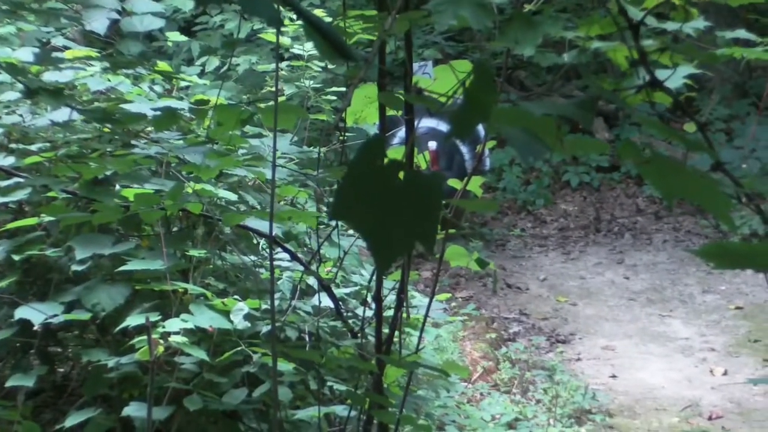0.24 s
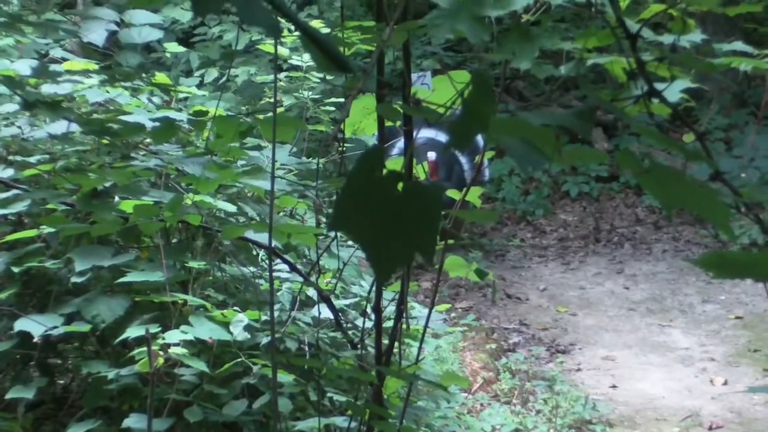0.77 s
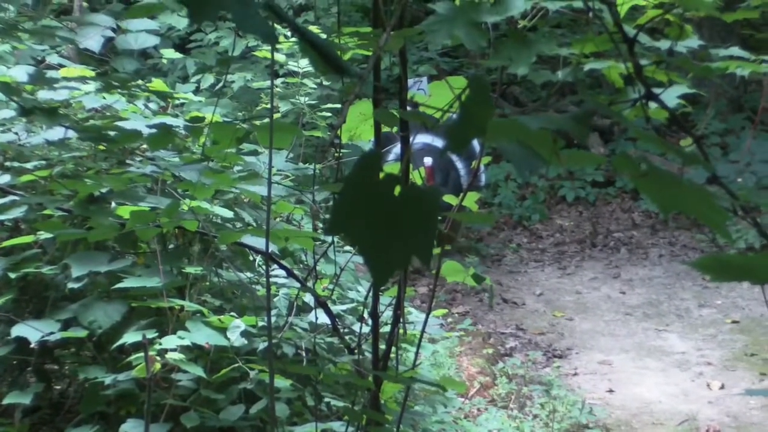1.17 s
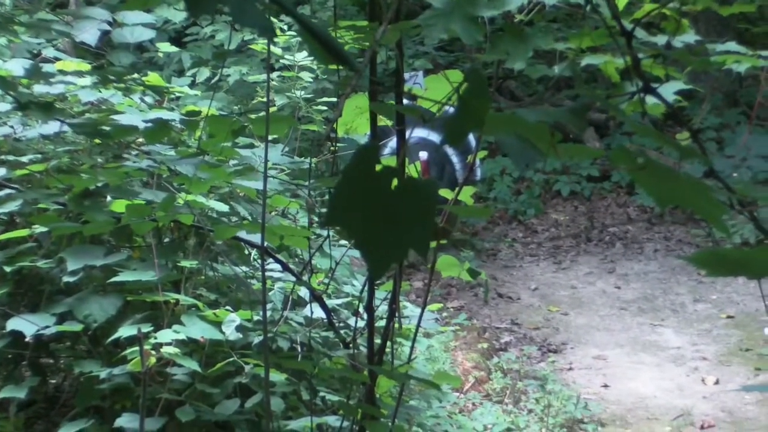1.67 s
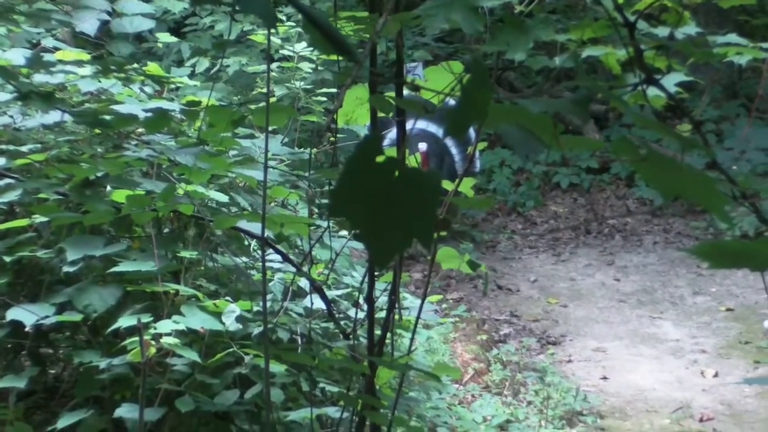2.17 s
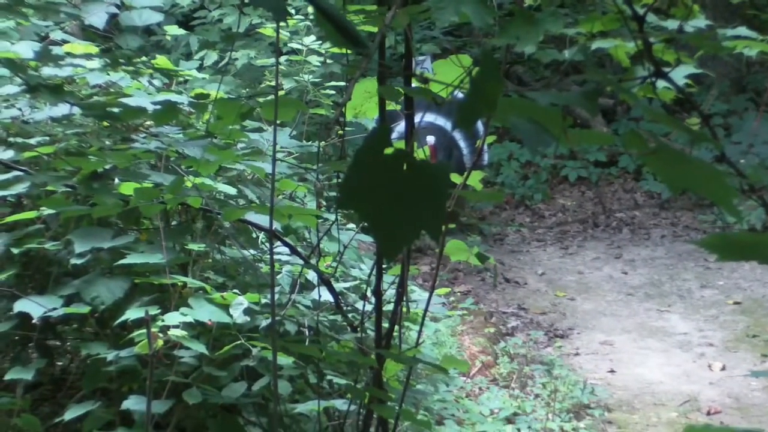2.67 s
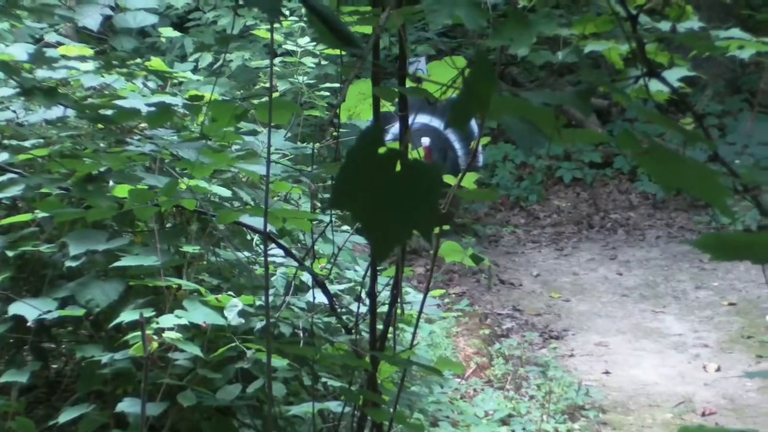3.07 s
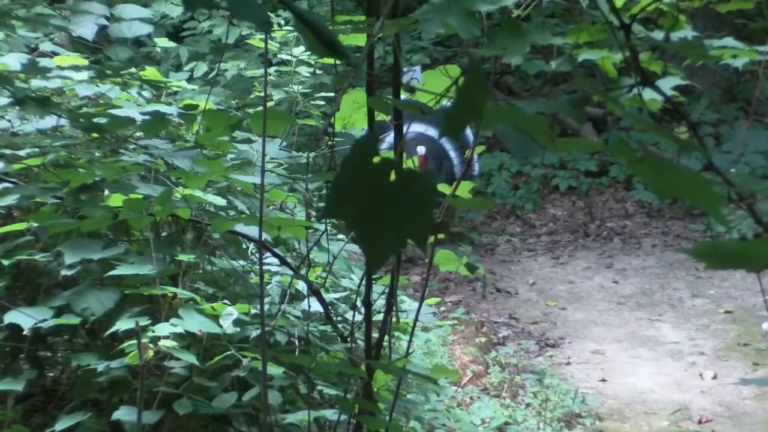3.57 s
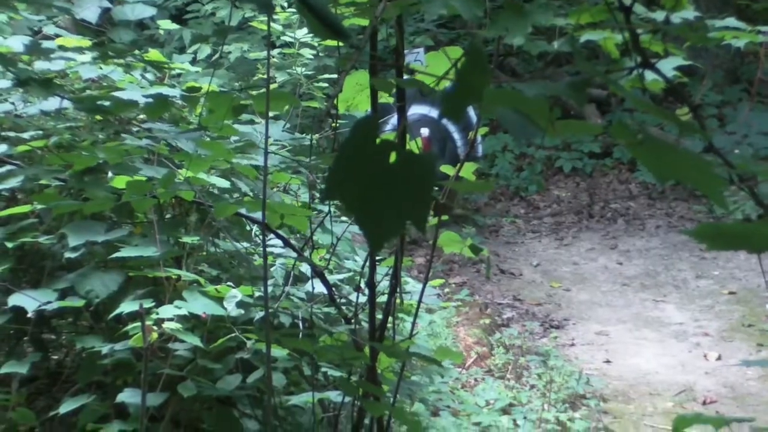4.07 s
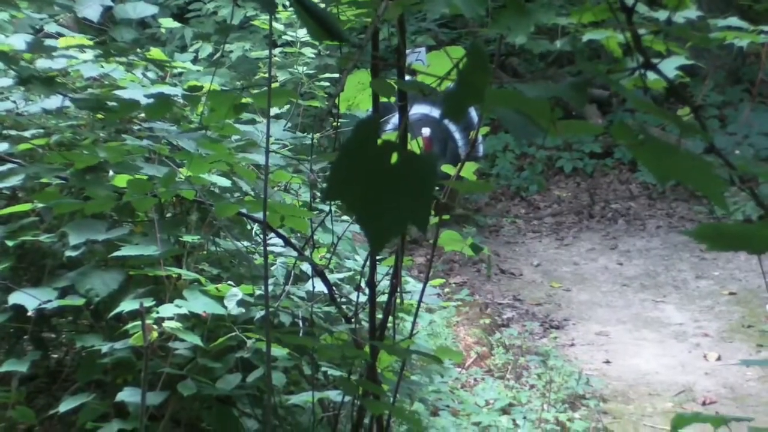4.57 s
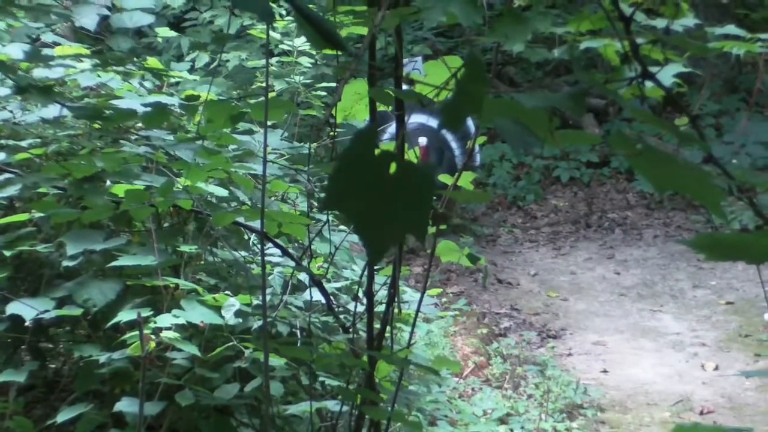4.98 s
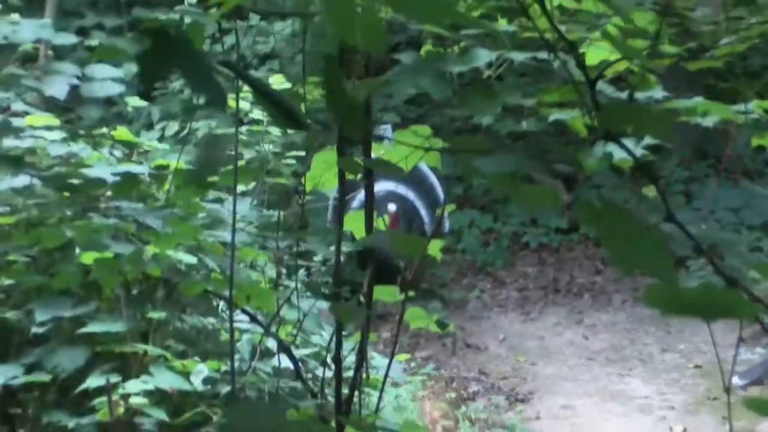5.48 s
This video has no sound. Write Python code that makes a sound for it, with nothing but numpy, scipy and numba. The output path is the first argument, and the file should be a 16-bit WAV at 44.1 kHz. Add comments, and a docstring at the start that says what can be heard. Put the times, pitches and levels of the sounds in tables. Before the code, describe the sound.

A low, quiet rumble of far traffic runs throughout, in a wood. At about 0.3 seconds a crossbow's steel safety catch ticks lightly, with a clearer click at 0.5 seconds. A distant engine drones and fades away from about 1.5 seconds. An insect gives very faint, thin buzzes near 1.6, 3.1 and 4.8 seconds. Two far cars pass softly at around 4 and 4.9 seconds. At 5.2 seconds the trigger ticks and the crossbow fires at once with a very loud, sharp crack, a quick rattle of loose parts and a short low hum from its arms and string. The crack overloads the microphone, so the level dips briefly before the echo from the trees swells back. At 5.5 seconds the bolt hits the target with a quieter snap and dull thud.

```python
"""A crossbow shot in the woods. Far traffic rumbles all along, and first the steel safety catch clicks.
An engine draws away, an insect buzzes faintly and two far cars pass. At 5.2 s the trigger ticks, the
string slams into its stops, loose parts rattle and the bow's arms hum. The crack overloads the microphone,
so gain control turns the sound down, then lets the echo of the trees swell back.
A quarter of a second after the crack, the bolt thuds into the target."""
import sys
import numpy as np
from scipy import signal
from scipy.fft import rfft, irfft, next_fast_len
from scipy.io import wavfile
from scipy.ndimage import map_coordinates
from numba import njit

SR = 44100
rng = np.random.default_rng(int(sys.argv[2]) if len(sys.argv) > 2 else 0)


def unload_audio(sound):
    """Save the sound as a 16-bit wav file, at the path given as the first command line argument."""
    columns = np.transpose(np.atleast_2d(sound))
    # keep every value between -1 and 1, then stretch to whole-number steps
    steps = np.round(np.clip(columns, -1, 1) * 32767)
    wavfile.write(sys.argv[1], SR, steps.astype(np.int16))


N = 253134
T = np.arange(N) / SR
STOP_S = 5.2378  # the string reaches its stops
LEFT_RIGHT = np.array([[1], [-1]])  # adds on the left, subtracts on the right


def undb(db):
    """Turn decibels into a gain."""
    return 10 ** (np.asarray(db) / 20)


def unit(x):
    """Scale to an average (rms) level of 1."""
    return x / np.sqrt(np.mean(x ** 2))


def noise(colour, size=N):
    """Noise of rms 1; the colour's rows (f/Hz, level/dB) say which pitches are stronger."""
    hz, db = np.transpose(colour)
    n = next_fast_len(size)
    f = np.maximum(np.fft.rfftfreq(n, 1 / SR), 1)
    gain = undb(np.interp(np.log(f), np.log(hz), db))
    return unit(irfft(rfft(rng.standard_normal(n)) * gain, n)[:size])


def walk(rate):
    """A smooth random wobble of rms 1 that changes rate times a second."""
    points = rng.standard_normal(N)[:int(T[-1] * rate) + 4]
    return unit(map_coordinates(points, [T * rate], order=2, mode="nearest"))


def fade(t, t60):
    """Die away by 60 dB in t60 seconds, the ring time."""
    return np.exp(-np.log(1000) * t / t60)


def ring(modes, size):
    """The fading tones of a struck object, from rows of f/Hz, level/dB, ring time/s."""
    t = T[:size]
    return sum(undb(db) * np.sin(2 * np.pi * hz * t) * fade(t, t60) for hz, db, t60 in modes)


def add(out, s, x):
    """Mix x into out, starting at s seconds."""
    i = int(s * SR)
    out[i:i + len(x)] += x[:N - i]


# colour of far traffic and leaves: f/Hz, level/dB
RUMBLE_COLOUR = [(12, -30.5), (20, -5), (60, 2.5), (93, -8.5), (120, -8), (158, -10), (198, -8),
                 (228, -10.5), (262, -10.5), (410, -18.5), (738, -16), (1710, -24), (2200, -33.5),
                 (6720, -47), (16000, -57.5)]
# colour of tyres on the road: f/Hz, level/dB
TYRE_COLOUR = [(200, -33.5), (450, -1), (800, 8), (1050, -0.5), (1400, -2.5), (2200, -53.5), (4000, -46)]
# each car at its nearest: t/s, level/dB
CARS = [(4.049, -42.5), (4.85, -43.5)]
def traffic(rumble_db=-39, pass_s=.26, drone_hz=127, drone_db=-45.5, leaves_s=1.45, fall_db_per_s=11):
    """A far road rumbles, tyres swell as each car nears, and a wavering engine draws away."""
    rumble = noise(RUMBLE_COLOUR) * undb(rumble_db + .5 * walk(5.82))
    swells = [undb(db) / np.hypot(1, (T - s) / pass_s) for s, db in CARS]  # 3 dB down after pass_s
    tyres = noise(TYRE_COLOUR) * np.linalg.norm(swells, axis=0) * undb(walk(9))
    phase = 2 * np.pi * np.cumsum(drone_hz + 2.5 * walk(11)) / SR
    low_tone = np.sin(phase) * undb(2 * walk(6.2))
    octave = np.sin(2 * phase) * undb(-4 + 2 * walk(23))
    engine = (low_tone + octave) * undb(drone_db - fall_db_per_s * np.maximum(T - leaves_s, 0))
    return rumble + tyres + engine


# an insect's thin buzzes: t/s, length/s, level/dB
BUZZES = [(1.58, .18, -73), (3.06, 0.21, -71), (4.75, 0.21, -72)]
def insect(pitch_hz=7300, width_hz=1100):
    """Short high buzzes, blurred by the leaves."""
    out = np.zeros(N)
    lowpass = signal.butter(2, width_hz / 2, fs=SR, output="sos")
    for s, length, db in BUZZES:
        n = int(length * SR)
        blur = signal.sosfilt(lowpass, rng.standard_normal(SR))[:n]
        buzz = unit(blur * np.sin(2 * np.pi * pitch_hz * T[:n]))
        add(out, s, undb(db) * buzz * signal.windows.tukey(n, .5))
    return out


# colour of the trees' echo: f/Hz, level/dB
ECHO_COLOUR = [(80, -10), (250, 7.5), (600, 7), (1500, 1.5), (2600, -1.5), (3800, -5), (5200, -4.5),
               (6400, -1.5), (7600, -13.5), (9500, -24), (15000, -26.5)]
def tree_echo(echo_db=-23, t60=1.0, build_s=.03):
    """Trunks and leaves scatter the crack into a long, fading wash of noise."""
    age = np.maximum(T - STOP_S, 0)
    build_up = 1 - np.exp(-age / build_s)
    return noise(ECHO_COLOUR) * undb(echo_db) * build_up * fade(age, t60)


# clicks of the safety catch and trigger: t/s, level/dB, ring time/s
CLICKS = [(0.2834, -42.5, .016), (.3075, -46, .016), (.4917, -47, .012), (0.5078, -31, 0.011),
          (.5110, -30.5, .013), (.5426, -48, .01), (5.2033, -25.5, 0.041)]
# tones of the steel latch: f/Hz, level/dB, ring time as a multiple of the click's
LATCH_TONES = [(3270, -10, 1), (3440, 2.5, 1.7), (3590, -6, 1), (3940, 0.5, .8), (4230, -2, .8),
               (4630, 0, .8), (5530, -5, .6)]
def latch(snap_db=-8, snap_t60=.008, band_hz=(2800, 5100), size=4000):
    """Small steel parts meet with a dry snap and ring briefly."""
    out = np.zeros(N)
    bandpass = signal.butter(3, band_hz, "bandpass", fs=SR, output="sos")  # too small to give off lows
    for s, db, t60 in CLICKS:
        tones = ring([(hz, tone_db, t60 * share) for hz, tone_db, share in LATCH_TONES], size)
        snap = undb(snap_db) * np.abs(tones).max() * rng.standard_normal(size) * fade(T[:size], snap_t60)
        tick = signal.sosfilt(bandpass, tones + snap)
        add(out, s, undb(db) * tick / np.abs(tick).max())
    return out


# the bolt pierces the target's face: t/s, level/dB
SNAPS = [(5.4931, -9.5), (5.4946, -12.5)]
# colour of those snaps: f/Hz, level/dB
SNAP_COLOUR = [(300, 1), (900, -8), (1400, 13), (2300, 5), (4000, -8.5), (7000, -17), (15000, -30)]
# tones of the block behind the face: f/Hz, level/dB, ring time/s
BLOCK_TONES = [(96, -31, 0.11), (212, -9, 0.038), (302, -20, 0.038), (466, -15.5, 0.033), (795, -15, 0.018)]
def target(snap_t60=.0058, thud_s=5.4973, size=2000):
    """The bolt snaps through the face, then the block stops it with a dull thud."""
    out = np.zeros(N)
    for s, db in SNAPS:
        snap = noise(SNAP_COLOUR, size) * fade(T[:size], snap_t60)
        add(out, s, undb(db) * snap / np.abs(snap).max())
    add(out, thud_s, ring(BLOCK_TONES, size=SR))
    return out


# tones of the bow's arms and string: f/Hz, level/dB, ring time/s
ARM_TONES = [(60, -4.5, 0.045), (91, -5.5, .52), (122, 13, 0.082), (152, 12, 0.33), (170, 11, .09),
             (273, 23, 0.033), (276, -13.5, 0.75), (397, 13, 0.024), (480, -8, 0.28), (772, 19, 0.022),
             (734, -21, 0.7), (970, 22.5, 0.045), (1440, 20.5, .035), (2780, -14, 0.36), (3500, -24.5, .32)]
def bow_arms(release_s=5.2316, release_db=-28):
    """The freed string jolts the bow, then thumps it at the stops; arms and string hum on."""
    out = np.zeros(N)
    hum = ring(ARM_TONES, size=SR)
    add(out, release_s, undb(release_db) * hum)
    add(out, STOP_S, -hum)
    return out


def rattle(count=12, start_s=5.2585, gap_s=.0042, fall_db_per_s=137, t60=.016, centre_hz=3950):
    """Loose parts knock on the frame, almost evenly and fading; gives rows like those of BLOWS."""
    time_scatter, level_scatter = rng.standard_normal((count, 2)).T
    age = gap_s * np.arange(count)
    times = start_s + age + .0011 * time_scatter
    levels = .5 - fall_db_per_s * age + 2.5 * level_scatter
    return [(s, db, t60, centre_hz) for s, db in zip(times, levels)]


# blows on the crossbow's frame: t/s, level/dB, ring time/s, centre f/Hz
BLOWS = [(5.2316, 20.6, .05, 3100), (5.2347, 28.5, 0.053, 3420), (5.2392, 37.5, 0.026, 2485),
         (5.2946, 3, 0.0081, 3800)]
# tones of the frame: f/Hz, level/dB, ring time as a multiple of the blow's
FRAME_TONES = [(997, -3, 1.2), (1413, -3, 1.1), (2098, -4, 1), (2245, -6, 1), (2490, -3, 1), (2657, -3, 1),
               (2803, -2, 1), (2900, -5, 1), (3049, -6, 1), (3291, 1, 1.1), (3499, -1, 1.1),
               (3718, -6, 1.1), (3920, -5, 1.2), (4160, -6, 1.1), (4420, -8, 1)]
# colour of the noise as parts hit: f/Hz, level/dB
CRACK_COLOUR = [(200, -17.5), (500, -6.5), (900, -6), (1800, -3), (3300, -7), (4700, -3), (6500, -10.5),
                (9000, -29.5), (15000, -47.5)]
def frame(crack_db=-12, band_octaves=.31, contact_s=.00048, size=6000):
    """Each blow of the shot and the rattle cracks and rings the frame's tones near its centre pitch."""
    out, t = np.zeros(N), T[:size]
    push = 1 - np.exp(-(t / contact_s) ** 2)  # the force takes a moment to build
    hz, tone_db, share = np.transpose(FRAME_TONES)[:, :, None]
    for s, db, t60, centre_hz in BLOWS + rattle():
        gain = undb(tone_db - (np.log2(hz / centre_hz) / band_octaves) ** 2)
        swing = np.sin(2 * np.pi * (hz * t + rng.random(hz.shape)))
        body = np.sum(gain * swing * fade(t, t60 * share), axis=0) / np.linalg.norm(gain)
        crack = noise(CRACK_COLOUR, size) * fade(t, t60)
        add(out, s, undb(db) * (body + undb(crack_db) * crack) * push)
    return out


def scene(apart_db=-80):
    """Left and right hear the same, except for a trace of the far rumble."""
    mono = latch() + frame() + bow_arms() + target() + tree_echo() + traffic() + insect()
    return mono + LEFT_RIGHT * undb(apart_db) * noise(RUMBLE_COLOUR)


@njit
def gain_control(over_db, attack_s, hold_s, release_db_per_s):
    """How many dB to turn down: follows a too-loud sound quickly, holds, then lets go steadily."""
    out = np.empty(len(over_db))
    peak, cut, wait = 0., 0., 0.
    for i in range(len(over_db)):
        wait -= 1
        if over_db[i] > peak:
            peak, wait = over_db[i], hold_s * SR
        elif wait < 0:
            peak = max(peak - release_db_per_s / SR, 0.)
        cut += (peak - cut) / (attack_s * SR)
        out[i] = cut
    return out


# colour of the microphone's own hiss: f/Hz, level/dB
HISS_COLOUR = [(600, -31.5), (1500, -2), (2900, 30.5), (8000, 25), (15000, -36)]
def record(dry, threshold_db=4, hiss_db=-77, ceiling=.96, treble_hz=7000, wide_hz=15500, top_hz=15900):
    """Gain control is too late, so the crack distorts; the highs are softened, spread and cut off."""
    over_db = 20 * np.log10(np.abs(dry).max(axis=0) + 1e-9) - threshold_db
    gain = undb(-gain_control(over_db, attack_s=.0018, hold_s=.095, release_db_per_s=172))
    hiss = undb(hiss_db) * np.array([noise(HISS_COLOUR), noise(HISS_COLOUR)])
    squashed = ceiling * np.tanh((dry + hiss) * gain / ceiling)
    soft = signal.sosfilt(signal.butter(1, treble_hz, fs=SR, output="sos"), squashed)
    # a late copy of the very highest sounds makes left and right differ
    late = np.roll(soft, int(.0004 * SR), axis=1)
    side = signal.sosfilt(signal.butter(2, wide_hz, "highpass", fs=SR, output="sos"), late)
    fade_in = np.minimum(T / .005, 1)
    top_cut = signal.ellip(10, .2, 90, top_hz, fs=SR, output="sos")
    return signal.sosfilt(top_cut, fade_in * (soft + LEFT_RIGHT * side))


dry = scene()
out = record(dry)
unload_audio(out)
```